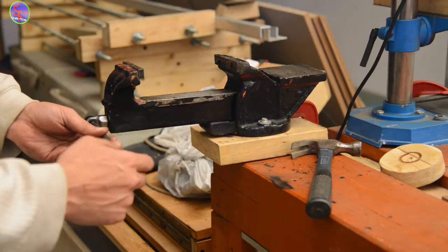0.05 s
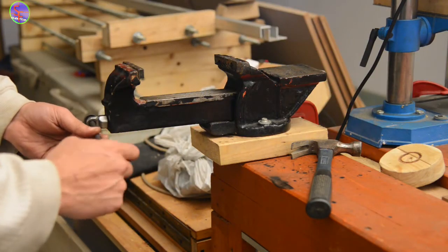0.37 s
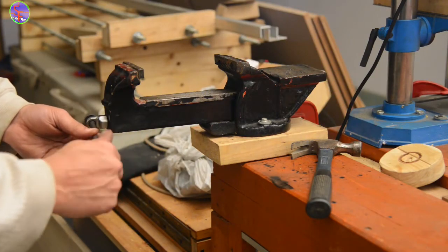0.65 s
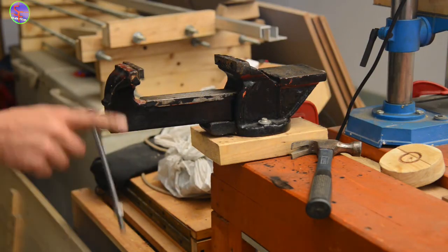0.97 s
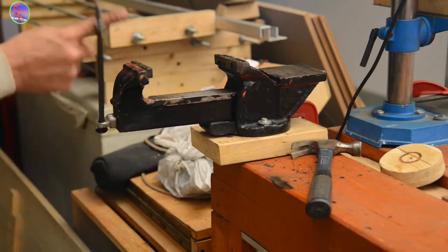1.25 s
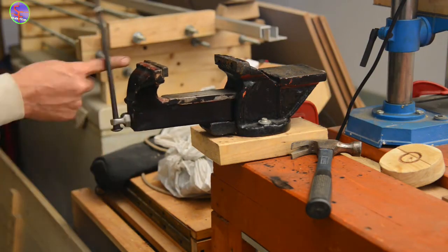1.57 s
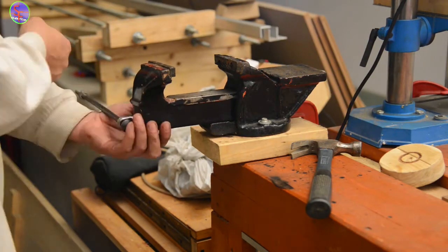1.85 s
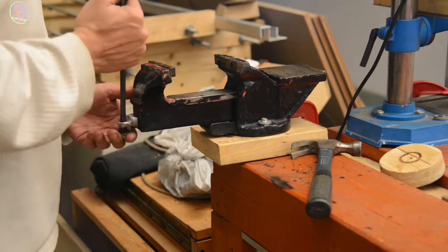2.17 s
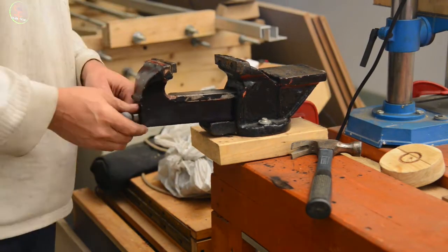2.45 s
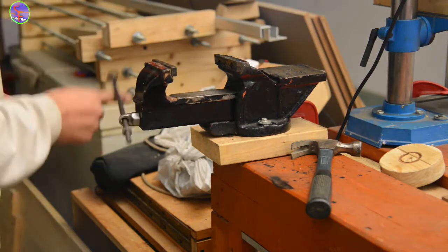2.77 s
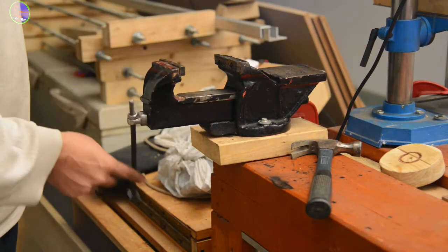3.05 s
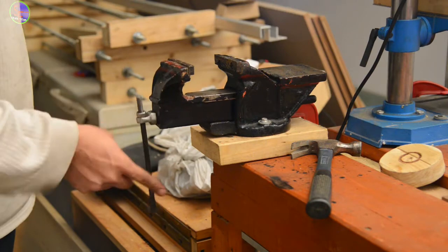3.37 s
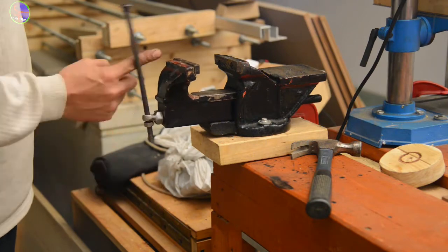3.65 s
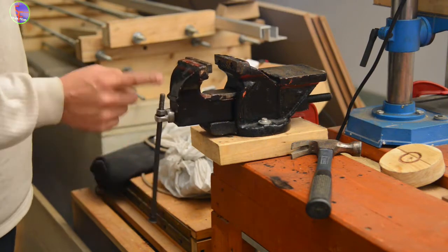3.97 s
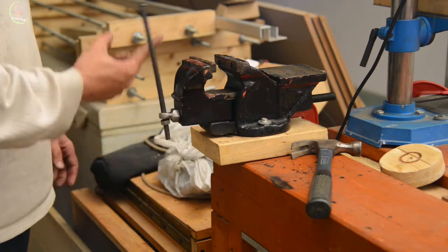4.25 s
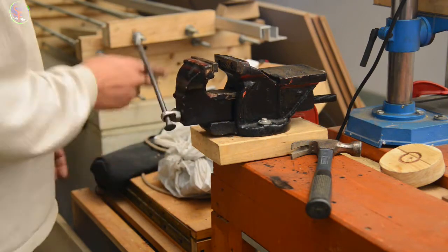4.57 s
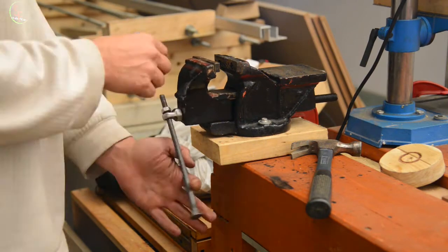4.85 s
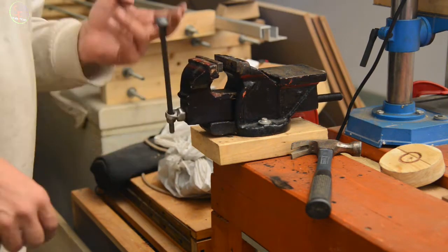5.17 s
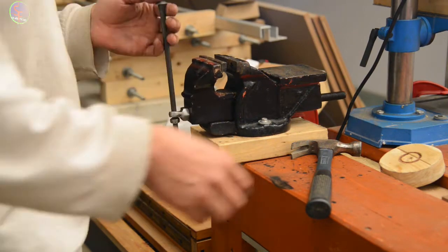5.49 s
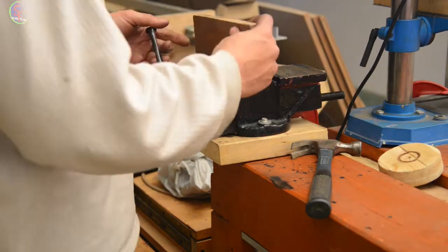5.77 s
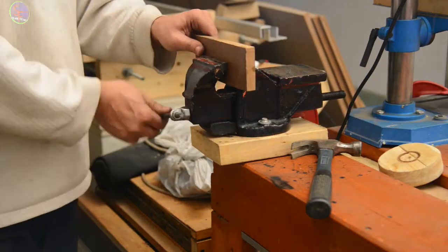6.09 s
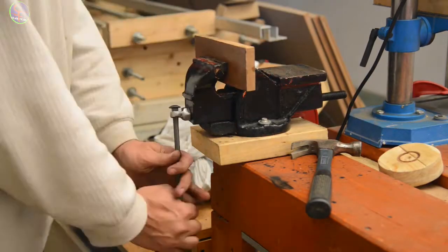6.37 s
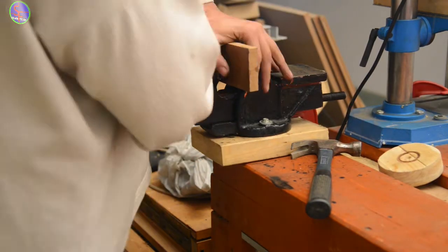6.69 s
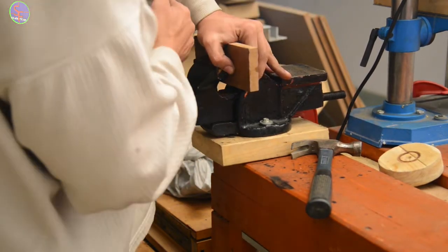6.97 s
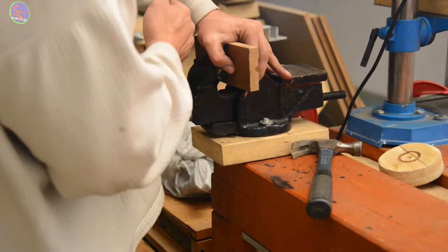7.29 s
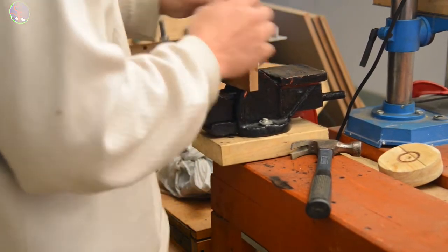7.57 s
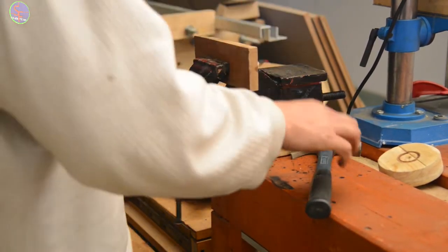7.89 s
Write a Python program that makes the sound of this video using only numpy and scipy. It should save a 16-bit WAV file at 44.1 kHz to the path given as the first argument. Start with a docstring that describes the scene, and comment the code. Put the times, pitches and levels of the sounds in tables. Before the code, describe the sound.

Fast-forwarded scraping and clinking of an iron vise being cranked, one bright wooden clack, and finally a sliding steel handle landing with a ringing clank.

```python
"""A workshop hums and a lead screw rasps as a cast-iron vise is screwed together, ten times too fast.
The handle clinks, jolts reach the bench, static hits the right channel once, a board clacks into the
jaws. Near the end time runs normally: the steel handle slides through its collar, drops against its
end knob and rings, pressing on the recorder's limiter."""
import sys
import numpy as np
from scipy import signal
from scipy.fft import rfft, irfft, next_fast_len
from scipy.io import wavfile
from scipy.ndimage import uniform_filter1d, minimum_filter1d, map_coordinates

SR = 44100
rng = np.random.default_rng(int(sys.argv[2]) if len(sys.argv) > 2 else 0)


def file_out(sig):
    """Save sig as 16-bit WAV at sys.argv[1]."""
    # one column per channel
    cols = np.atleast_2d(sig).T
    # limit, then scale
    lim = np.clip(cols, -1, 1)
    pcm = np.round(lim * 32767).astype(np.int16)
    wavfile.write(sys.argv[1], SR, pcm)


N = 358519
TOP_HZ = 15800


def amp(db):
    return 10 ** (np.asarray(db) / 20)


def unit_rms(x):
    return x / np.sqrt(np.mean(x ** 2) + 1e-20)


def decay(t, t60_s):
    return np.exp(-np.log(1000) * t / t60_s)


def along(points, hz):
    """Read (freq_hz, value) points on a log frequency axis."""
    freqs_hz, values = np.transpose(points)
    return np.interp(np.log(hz + 1), np.log(freqs_hz + 1), values)


def spectrum(points, peaks):
    """Gain against frequency: a broad curve with resonances on it."""
    def gain(hz):
        lift_db = sum(db / (1 + (2 * (hz - peak_hz) / width_hz) ** 2) for peak_hz, width_hz, db in peaks)
        return amp(along(points, hz) + lift_db)
    return gain


def filtered(x, gain):
    """Apply gain(hz) to x."""
    size = next_fast_len(len(x) + 4096)
    return irfft(rfft(x, size) * gain(np.fft.rfftfreq(size, 1 / SR)), size)[:len(x)]


def noise(gain, size):
    """Coloured noise, rms 1."""
    return unit_rms(filtered(rng.standard_normal(size), gain))


def wobble(rate_hz, size):
    """Smooth random curve."""
    coarse = np.arange(size // 64 + 2) * 64
    knots = rng.standard_normal(int(size * rate_hz / SR) + 4)
    return np.interp(np.arange(size), coarse, map_coordinates(knots, [coarse * rate_hz / SR]))


def add(track, start_s, sound):
    start = round(start_s * SR)
    track[start:start + len(sound)] += sound[:len(track) - start]


# Motor hum at normal speed: freq_hz, line_rms_db
HUM_TONE = [(25, -85.5), (50, -79), (100, -73), (280, -72), (400, -76), (720, -76.5), (900, -68),
            (1040, -84.5)]
# Strong and weak harmonics: order -> offset_db
HUM_ACCENTS = {6: 2.5, 8: -8, 10: 10, 11: -8, 13: 7.5, 16: 10}
# Electrical whistles at normal speed: pitch_hz, rms_db
WHISTLES = [(1433.2, -79), (1482.6, -78), (2320, -73), (2719, -72), (3311, -79), (4845, -77), (6422, -73),
            (8053, -71), (15725, -68)]


def hum(speed, motor_hz=49.42, orders=21):
    """Motor harmonics and whistles, slightly unsteady; pitch scales with the speed of time."""
    t = np.arange(N) / SR
    motor = [(k * motor_hz, along(HUM_TONE, k * motor_hz) + HUM_ACCENTS.get(k, 0))
             for k in [.5, *range(1, orders + 1)]]
    out = np.zeros(N)
    for hz, db in motor + WHISTLES:
        if speed * hz < TOP_HZ:
            phase = 2 * np.pi * (speed * hz * t + rng.random()) + .3 * wobble(12, N)
            out += amp(db) * np.sqrt(2) * np.sin(phase)
    return out


# Room noise, fast and normal speed: freq_hz, density_db
AIR_FAST = [(59, -79), (100, -38.5), (243, -21.5), (917, -10.5), (998, -10), (1090, -10.5), (1960, -10.5),
            (3690, -11.5), (8060, -9), (15500, -14.5)]
AIR_NORMAL = [(15, -35.5), (30, -28), (120, -12), (811, -17), (2300, -22.5), (2500, -23), (2700, -22.5),
              (4380, -25), (8320, -24.5), (15000, -45)]


def workshop(air, air_db, speed):
    """Hum over steady room noise."""
    return hum(speed) + amp(air_db) * noise(spectrum(air, []), N)


def friction(rate_hz, spread_db, t60_s, wet_db):
    """Tiny slips of uneven size, smeared by the room."""
    slips = (rng.random(N) < rate_hz / SR) * rng.standard_normal(N)
    slips *= amp(spread_db * np.minimum(rng.exponential(size=N), 4))
    t = np.arange(SR // 4) / SR
    tail = rng.standard_normal(len(t)) * decay(t, t60_s)
    return slips + amp(wet_db) * signal.fftconvolve(slips, tail / np.linalg.norm(tail))[:N]


def wandering(x, depth_db):
    """The contact point wanders, so the colour keeps shifting."""
    bins = signal.stft(x, nperseg=256)[2]
    patches = uniform_filter1d(rng.standard_normal(bins.shape), size=4, axis=0)
    patches = uniform_filter1d(patches, size=9, axis=1)
    return signal.istft(bins * amp(depth_db * unit_rms(patches)), nperseg=256)[1][:len(x)]


def stroke(t, start_s, end_s, grip_s=0.023, release_t60_s=0.2):
    """One hand movement bites quickly, holds, and dies away in the room."""
    return np.clip((t - start_s) / grip_s, 0, 1) * decay(np.maximum(t - end_s, 0), release_t60_s)


def effort_db(t, start_s, end_s, first_db, last_db, arch_db=2):
    """A spin's level drifts from first to last, arching in the middle."""
    progress = np.clip((t - start_s) / (end_s - start_s), 0, 1)
    return first_db + (last_db - first_db) * progress + arch_db * (np.sin(np.pi * progress) - 2 / np.pi)


# Thread rasp: freq_hz, density_db
RASP_TONE = [(200, -104.5), (380, -21.5), (460, -9.5), (650, -24.5), (900, 0.5), (1500, 0), (3000, 1.5),
             (5000, 2.5), (6300, 1), (8000, 3), (11000, 0), (15500, 4)]
# Vise resonances at the fast speed: freq_hz, width_hz, lift_db
VISE_PEAKS = [(1400, 50, 4), (2430, 180, 5.5), (3935, 50, 4), (4550, 160, 2.5), (7320, 220, 4),
              (7830, 90, 2), (8600, 100, 3.5), (9240, 70, 3.5), (13300, 300, 3)]
# The handle spins the screw: start_s, end_s, first_db, last_db, turn_hz, body_db, top_db
SPINS = [(0.995, 1.751, -41, -39.5, 29.4, 4.5, -1.5), (2.743, 3.589, -44.5, -42.5, 28.4, 1, -7.5),
         (3.629, 3.981, -44, -33, 26, 0, -7.5), (4.081, 4.319, -37.5, -40.5, 23, -3.5, -4.5)]
# Hands shift handle and jaw: start_s, length_s, level_db, top_db
RUBS = [(0.001, 0.069, -54, 10), (0.194, 0.7, -60, -8), (0.949, 0.036, -52, -11), (2.422, 0.12, -43.5, -3),
        (2.598, 0.087, -48.5, -14), (4.491, 0.25, -48, -1), (4.819, 0.081, -51.5, -4),
        (4.964, 0.04, -49.5, -2), (5.152, 0.029, -44, -8), (5.213, 0.036, -43, -8), (5.29, 0.2, -50, -2.5),
        (5.802, 0.055, -44, -3.5), (6.001, 0.06, -49, 2.5), (6.43, 0.1, -59, 12)]


def lead_screw(spin_db=2.5, rub_db=3, throb_db=1.6, lag_s=0.012, waver_db=2, body_hz=2000, top_hz=10500):
    """The dry thread rasps in the iron body: spins swell once a turn, rubs waver."""
    out, t = np.zeros(N), np.arange(N) / SR
    slips = friction(rate_hz=3000, spread_db=2.5, t60_s=.12, wet_db=5)
    rasp = unit_rms(filtered(wandering(slips, depth_db=3), spectrum(RASP_TONE, VISE_PEAKS)))
    body = filtered(rasp, lambda hz: 1 / (1 + (hz / body_hz) ** 4) / (1 + (600 / (hz + 1)) ** 8))
    top = filtered(rasp, lambda hz: 1 / (1 + (top_hz / (hz + 1)) ** 12))
    for start_s, end_s, first_db, last_db, turn_hz, body_db, top_db in SPINS:
        swell_db = throb_db * np.cos(2 * np.pi * turn_hz * (t - start_s - lag_s))
        level_db = spin_db + effort_db(t, start_s, end_s, first_db, last_db) + swell_db
        coloured = rasp + (amp(body_db) - 1) * body + (amp(top_db) - 1) * top
        out += amp(level_db) * stroke(t, start_s, end_s) * coloured
    waver = amp(rub_db + waver_db * wobble(35, N))
    for start_s, length_s, level_db, top_db in RUBS:
        coloured = rasp + (amp(top_db) - 1) * top
        out += amp(level_db) * waver * stroke(t, start_s, start_s + length_s) * coloured
    return out


# Steel parts meet: start_s, level_db, body_db, top_db (last two relative to the middle band)
CLINKS = [(0.211, -46.5, -4.5, 7.5), (0.685, -49.5, 0, 1), (1.753, -35, -7, -13), (1.8114, -35.5, -16, -12),
          (1.8313, -35.5, -4.5, -7), (1.8995, -34, -12, -4.5), (1.9929, -38.5, -1, -9),
          (2.0348, -45.5, -11, -17), (2.2272, -42, -8.5, -8), (2.3614, -38, -9, -11), (2.4223, -32, -5, -2),
          (2.508, -29, -7, 3.5), (2.529, -39, 0.5, -5), (3.158, -41, -8, 0), (3.3318, -36, -12, -4),
          (4.0825, -40.5, -8, -0.5), (4.3386, -32, -8, -5.5), (4.4817, -35.5, -5, -8),
          (4.5385, -35.5, -3.5, -11), (4.6954, -35.5, -6, -22), (5.0828, -39, -8.5, -11.5),
          (5.1383, -37, -8, -3), (5.2878, -38.5, -5.5, -11), (5.3228, -37.5, -8.5, 0), (5.439, -37, -7, -3),
          (5.47, -39.5, -4, 4), (5.5402, -43.5, -7, -10), (5.582, -41.5, -4.5, -10),
          (5.6002, -30.5, -14, -4), (5.7698, -40, -7, -10), (5.9258, -39, 3.5, -8), (5.9806, -32, -10, 2.5),
          (6.0699, -47, -6, 3), (6.2033, -40, -0.5, 11), (6.2507, -36.5, -5, 6), (6.333, -38.5, -14, 13),
          (6.553, -42, -3, 13), (6.8117, -50, -6, -11.5)]
# Clink with each jolt: level_db, body_db, top_db
JOLT_CLINK = (-34, -6, -2.5)


def contacts(turn_db=-1, stray_db=0.5, stray_gap_s=0.068):
    """Clink rows, plus ticks: the loose handle tips once a turn, loose parts stir during rubs."""
    def tick(at_s, level_db, scatter, scatter_db=3, body_db=-7.5, top_db=-5.5):
        return at_s, level_db + scatter_db * scatter, body_db, top_db

    rows = list(CLINKS) + [(start_s, *JOLT_CLINK) for start_s, _ in JOLTS]
    for start_s, end_s, first_db, last_db, turn_hz, _, _ in SPINS:
        for at_s, scatter in zip(np.arange(start_s, end_s, 1 / turn_hz), rng.standard_normal(40)):
            rows.append(tick(at_s, effort_db(at_s, start_s, end_s, first_db, last_db) + turn_db, scatter))
    for start_s, length_s, level_db, _ in RUBS:
        grid_s = np.arange(start_s, start_s + length_s, stray_gap_s)
        for at_s, (late, scatter) in zip(grid_s, rng.standard_normal((40, 2))):
            delay_s = stray_gap_s * min(abs(late), 2) / 2 * (at_s > start_s)
            rows.append(tick(at_s + delay_s, level_db + stray_db, scatter))
    return rows


# Small parts ringing: freq_hz, width_hz, lift_db
CLINK_PEAKS = [(3290, 200, 4), (7200, 250, 5)]


def clinks(gain_db=-1.58, edge_db=-2, lead_s=.02, low_hz=420):
    """Steel parts brush, then meet with a crack and a short room tail."""
    out, t = np.zeros(N + SR), np.arange(SR // 5) / SR - lead_s
    steel = spectrum(RASP_TONE, VISE_PEAKS + CLINK_PEAKS)

    def band(lo_hz, hi_hz):
        return noise(lambda hz: steel(hz) / (1 + (lo_hz / (hz + 1)) ** 18) / (1 + (hz / hi_hz) ** 18),
                     len(t))

    brush = 0.14 * decay(abs(t), t60_s=0.071)
    crack = 0.24 * decay(abs(t), t60_s=0.0041)
    tail = decay(abs(t), t60_s=0.14)
    envelope = np.where(t < 0, brush, crack + tail)
    for start_s, level_db, body_db, top_db in contacts():
        middle = band(2600, 12100)
        body = amp(body_db + edge_db) * band(300, 3070)
        top = amp(top_db + edge_db) * band(11600, 17000)
        clink = wandering(middle + body + top, depth_db=2.5) * envelope
        add(out, start_s, amp(level_db + gain_db) * clink)
    low_cut = signal.butter(4, low_hz, "high", fs=SR, output="sos")  # small parts radiate no bass
    return signal.sosfilt(low_cut, out)[round(lead_s * SR):][:N]


# Jolts reaching the bench: start_s, level_db
JOLTS = [(1.629, -69), (2.315, -68), (2.865, -55), (4.226, -63), (4.87, -65), (5.687, -46), (6.346, -59)]


def bench(gain_db=7, t60_s=0.002, low_hz=70):
    """Each jolt gives the bench one short, dull push."""
    out, t = np.zeros(N), np.arange(SR // 20) / SR
    push = t * decay(t, t60_s)
    for start_s, level_db in JOLTS:
        add(out, start_s, amp(level_db + gain_db) * push / push.max())
    return signal.sosfilt(signal.butter(1, low_hz, "high", fs=SR, output="sos"), out)


def static(start_s=4.6044, end_s=4.6433, drive_db=-3.5):
    """A burst of saturated white noise, right channel only."""
    out = np.zeros((2, N))
    start, end = round(start_s * SR), round(end_s * SR)
    hiss = noise(lambda hz: hz < TOP_HZ, end - start)
    out[1, start:end] = np.tanh(amp(drive_db) * hiss)
    return out


# Board against the jaws: start_s, level_db, t60_s, cutoff_hz
BOARD_KNOCKS = [(5.686, -7, 0.12, 15000), (5.702, -30, 0.18, 15130), (6.2135, -27, 0.074, 2200)]
# Wooden clack at the fast speed: freq_hz, density_db
BOARD_TONE = [(100, -60), (900, -42), (1700, -27), (2200, -14.5), (2520, 3), (3100, -16.5), (4200, -12.5),
              (5800, -7.5), (7050, -1.5), (8800, -6.5), (12000, -10), (15500, -5.5)]


def board(rise_s=0.012):
    """The board knocks on the jaws: a bright clack, raised in pitch by the speed."""
    out, t = np.zeros(N), np.arange(SR // 4) / SR
    for start_s, level_db, t60_s, cutoff_hz in BOARD_KNOCKS:
        wood = noise(lambda hz: amp(along(BOARD_TONE, hz)) / np.hypot(1, hz / cutoff_hz), len(t))
        add(out, start_s, amp(level_db) * wood * decay(t, t60_s) * (1 - decay(t, rise_s)))
    return out


# Handle sliding in its collar: time_s, level_db
SLIDE_LEVELS = [(7.42, -64), (7.51, -55), (7.57, -44), (7.615, -40.5), (7.655, -37), (7.7, -35),
                (7.76, -33.5), (7.8, -35.5)]
# Rod scrape: freq_hz, density_db
SLIDE_TONE = [(50, -26), (140, -7), (270, -16), (1080, -14.5), (1400, -14.5), (2200, -8.5), (3030, -14),
              (5400, -15), (8900, -15.5), (15000, -42)]
# Rod resonances: freq_hz, width_hz, lift_db
SLIDE_PEAKS = [(1380, 70, 15), (2150, 200, 9), (2670, 60, 10), (3800, 50, 8), (5390, 500, 7), (6650, 50, 7),
               (7060, 110, 8), (7950, 400, -7), (8520, 50, 8), (9030, 70, 10), (12500, 170, 15)]
# The rod catches: start_s, level_db, cutoff_hz
CATCHES = [(7.528, -42, 2800), (7.6225, -30, 12000), (7.629, -31, 12000)]


def handle_slide(chatter_db=1.5, attack_s=.05, release_s=0.035, catch_t60_s=0.15):
    """The steel rod slips through its collar, growing louder, and catches on the way."""
    t = np.arange(N) / SR
    times_s, levels_db = np.transpose(SLIDE_LEVELS)
    rod = spectrum(SLIDE_TONE, SLIDE_PEAKS)
    first_s, last_s = times_s[0], times_s[-1]
    contact = np.interp(t, [first_s - attack_s, first_s, last_s, last_s + release_s], [0, 1, 1, 0])
    scrape = unit_rms(filtered(friction(rate_hz=6900, spread_db=6.5, t60_s=0.44, wet_db=12), rod))
    out = contact * amp(np.interp(t, times_s, levels_db) + chatter_db * wobble(150, N)) * scrape
    envelope = decay(t[:SR // 3], catch_t60_s)
    for start_s, level_db, cutoff_hz in CATCHES:
        catch = noise(lambda hz: rod(hz) / (1 + (hz / cutoff_hz) ** 4), len(envelope))
        add(out, start_s, amp(level_db) * envelope * catch)
    return out


# Workshop echo: freq_hz, t60_s
ROOM_T60 = [(100, 2.1), (500, 1.26), (2000, 1.97), (6000, 0.97), (10000, 0.62), (15000, 0.38)]


def room_decay(x):
    """Each frequency dies away at the workshop's own rate."""
    hz, t, bins = signal.stft(x, SR, nperseg=256)
    return signal.istft(bins * decay(t, along(ROOM_T60, hz)[:, None]), SR, nperseg=256)[1][:len(x)]


# The knob lands and bounces: start_s, clatter_db, ring_db
DROPS = [(7.806, -20.5, -25), (7.875, -24, -26)]
# Handle modes: pitch_hz, level_db, t60_s
HANDLE_MODES = [(365, -13, 1.2), (1275, -11, 1.1), (1841, -4, 1.5), (1917, -1, 1.7), (1945, -3, 1.5),
                (2046, -3, 1.1), (2141, -4, 1.2), (2681, -14, .8), (3499, -18, 1.1), (5033, -18, 1),
                (6115, -9, .7), (6428, -15, 1), (7075, -6, .7), (7545, -16, .9), (9014, -6, .55),
                (10680, -13, .45), (12470, -15, .45)]
# Landing clatter: freq_hz, density_db
CLATTER_TONE = [(50, -30), (190, -8), (360, -11.5), (700, -6.5), (1300, -12), (1550, -21), (2300, -19.5),
                (4400, -16.5), (5200, -11.5), (9000, -11), (12000, -19.5), (15500, -36)]
# Clatter resonances: freq_hz, width_hz, lift_db
CLATTER_PEAKS = [(1970, 1100, 22.5), (6120, 80, 3), (6960, 100, 12.5), (9200, 49, 17)]


def handle_drop(bite=1.4, bite_t60_s=0.093, strike_db=4, strike_hz=9000):
    """The knob strikes; the rod's close modes beat over a clatter that fills the room."""
    out, t = np.zeros(N), np.arange(SR // 2) / SR
    landing_s, landing_db, _ = DROPS[0]
    strike = noise(lambda hz: 1 / (1 + (hz / strike_hz) ** 2), len(t)) * decay(t, t60_s=.03)
    add(out, landing_s, amp(landing_db + strike_db) * strike)
    accent = 1 + bite * decay(t, bite_t60_s)
    for start_s, clatter_db, ring_db in DROPS:
        ring = np.zeros(len(t))
        for hz, level_db, t60_s in HANDLE_MODES:
            phase = 2 * np.pi * (hz * t + rng.random())
            drift = .8 * wobble(max(45, hz / 50), len(t))
            ring += amp(level_db) * decay(t, t60_s) * np.sin(phase + drift)
        clatter = room_decay(noise(spectrum(CLATTER_TONE, CLATTER_PEAKS), len(t)))
        add(out, start_s, (amp(clatter_db) * clatter + amp(ring_db) * ring) * accent)
    return out


def limiter(x, threshold=.3, ceiling=.21):
    """The recorder cuts its gain on a peak, holds it briefly and rounds what is left."""
    needed = np.minimum(1, threshold / (np.abs(x).max(axis=0) + 1e-9))
    held = minimum_filter1d(needed, size=441, origin=180)
    ducked = x * uniform_filter1d(held, size=80)
    return ducked / (1 + (ducked / ceiling) ** 6) ** (1 / 6)


def scene(normal_from_s=6.965, crossfade_s=.01):
    """Fast work on the screw, then the handle's fall at normal speed; both channels alike."""
    fast = np.clip((normal_from_s - np.arange(N) / SR) / crossfade_s + .5, 0, 1)
    fast_shop = workshop(AIR_FAST, air_db=-59.5, speed=10)
    normal_shop = workshop(AIR_NORMAL, air_db=-58.5, speed=1)
    mono = fast * fast_shop + (1 - fast) * normal_shop
    mono += lead_screw() + clinks() + bench() + board() + handle_slide() + handle_drop()
    return np.array([mono, mono])


def record(dry):
    """Limiter, static burst, band limit."""
    return np.array([filtered(channel, lambda hz: hz < TOP_HZ) for channel in limiter(dry) + static()])


dry = scene()
out = record(dry)
file_out(out)
```